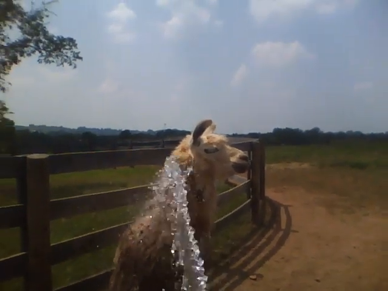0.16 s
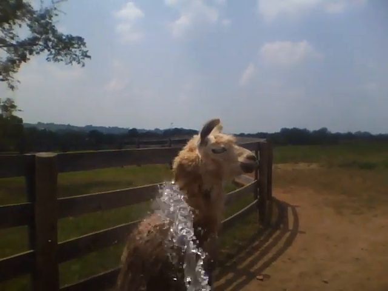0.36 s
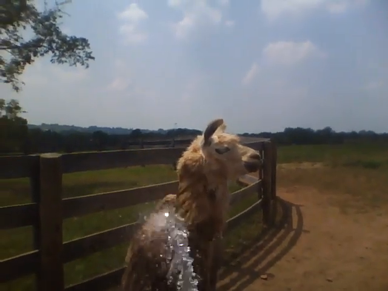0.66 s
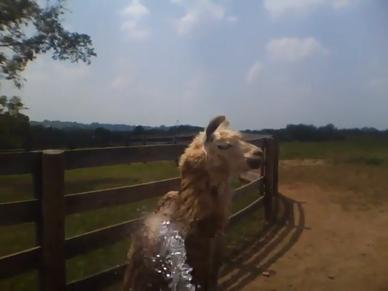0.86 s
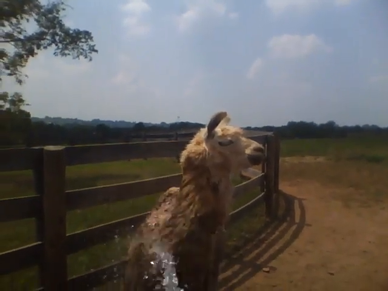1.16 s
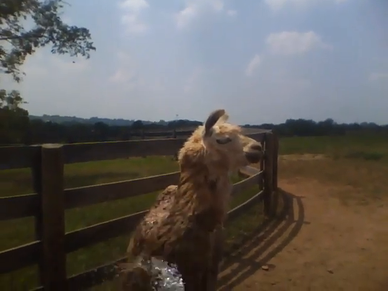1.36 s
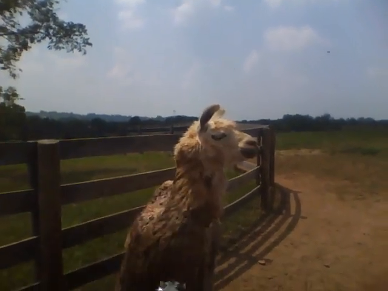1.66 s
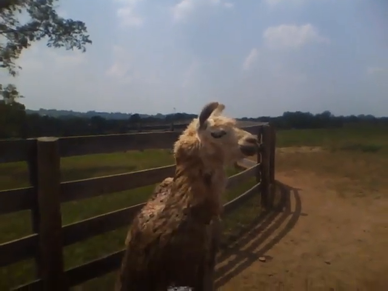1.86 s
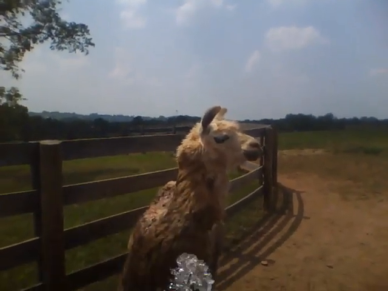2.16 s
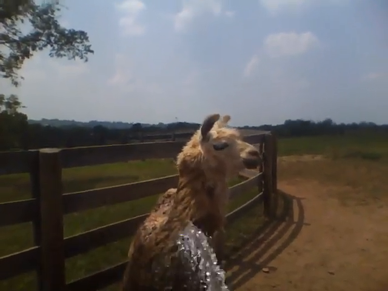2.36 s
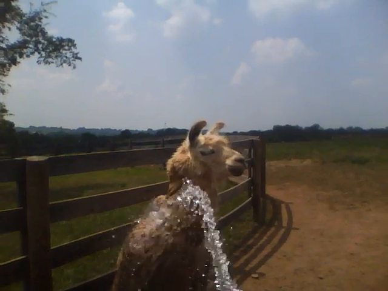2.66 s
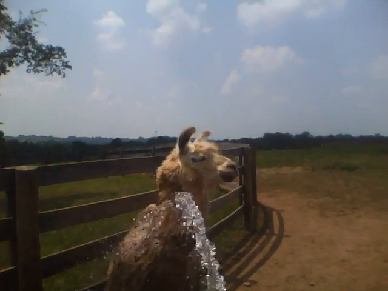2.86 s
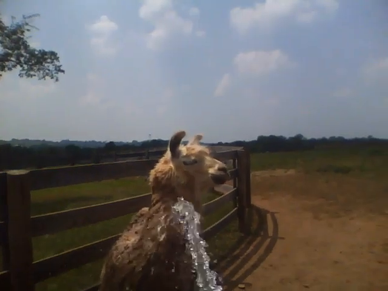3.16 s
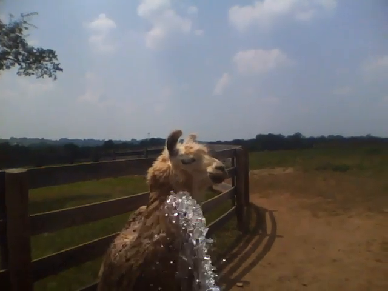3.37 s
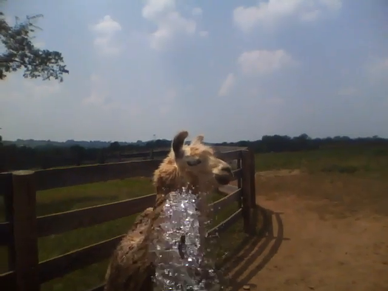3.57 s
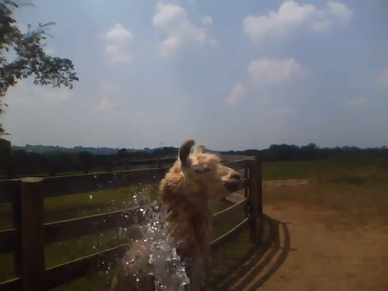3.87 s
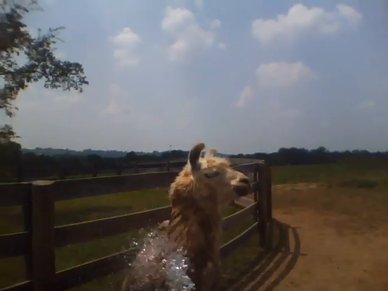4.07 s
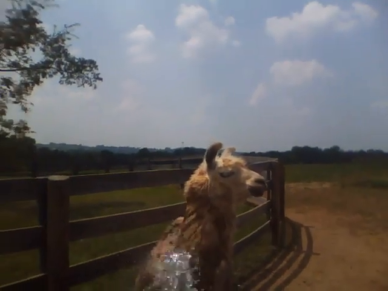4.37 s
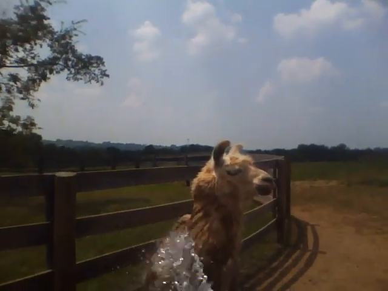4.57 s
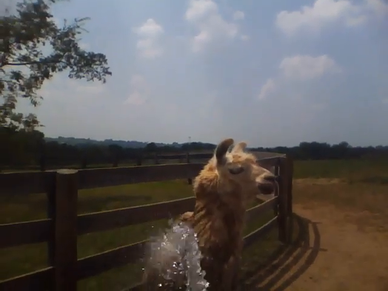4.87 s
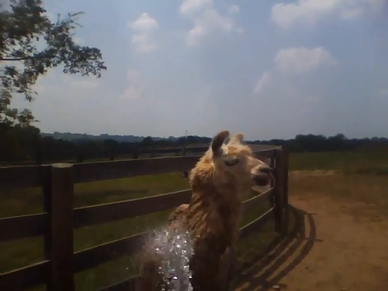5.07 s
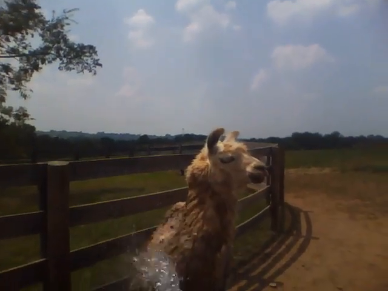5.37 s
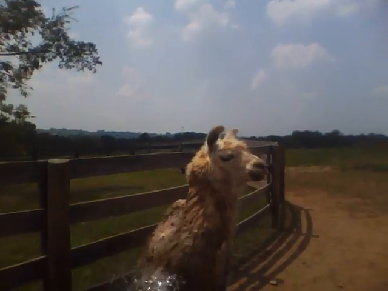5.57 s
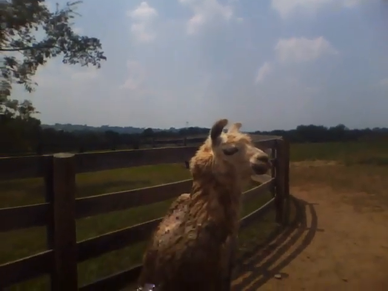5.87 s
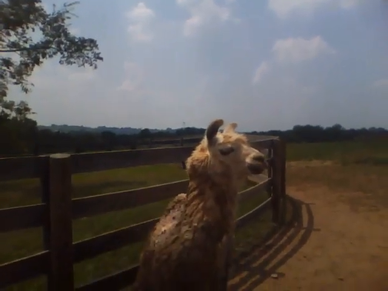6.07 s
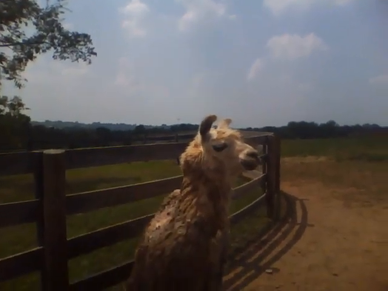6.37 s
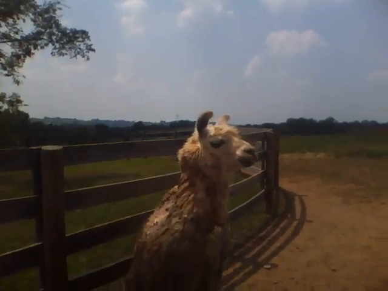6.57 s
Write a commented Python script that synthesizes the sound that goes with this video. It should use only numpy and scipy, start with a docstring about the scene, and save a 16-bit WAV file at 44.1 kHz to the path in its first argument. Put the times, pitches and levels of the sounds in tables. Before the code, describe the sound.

Water from a hose runs without a break for about 6.7 seconds over an animal's wet wool, close to a small camera in an open paddock. A bright, grainy hiss of fine spray mixes with crisp midrange splashing, flickering quickly as loose slugs land. Sparse slaps and plops mark the first second; a tight cluster of sharp slaps comes from 1.3 to 1.75. The stream thins around 2.0, then surges near 2.5 with soft low drumming on the flank. From 2.5 to 4.3 it is fullest, crowded with wet slaps and hollow bubbling plops. After 4.6 it eases into lighter spray, with scattered slaps and plops near 5.1, 5.7 and 6.4. Faint gurgling, low open-air and runoff rush and a nearly inaudible wavering hum remain underneath. The sound is centred, bass-light and slightly resonant.

```python
"""In a paddock, a garden hose plays a loose stream of water over an animal's wet wool, close to a small camera.
The stream breaks into uneven slugs: filtered noise and crowds of damped sines make spray, splash and gurgle,
and low noise drums on the flank. Flurries of short sines make the slaps, ringing bubbles make the plops.
Behind them lie two faint wavering sine tones and the low noise of open country and running-off water.
One microphone feeds both channels; the camera body rings and the microphone limits the band."""
import sys
import numpy as np
from scipy import signal
from scipy.fft import rfft, irfft, next_fast_len
from scipy.io import wavfile
from scipy.ndimage import uniform_filter1d, map_coordinates

SR = 44100
rng = np.random.default_rng(int(sys.argv[2]) if len(sys.argv) > 2 else 0)


def pcm_store(signal):
    """Save signal as 16-bit PCM."""
    levels = np.round(np.clip(np.atleast_2d(signal), -1, 1) * 32767)
    wavfile.write(sys.argv[1], SR, levels.astype(np.int16).T)


N = 296352  # samples, 6.72 s

# The stream as it sweeps the body: (time [s], spray level [dB], splash level [dB], drumming level [dB])
STREAM_LEVELS = [(0.0, -29.5, -35, -61), (0.47, -32.5, -38, -60), (0.9, -30.5, -32.5, -54.5),
                 (1.55, -29, -32, -51.5), (1.76, -30.5, -34.5, -56.5), (1.98, -32.5, -37, -70),
                 (2.24, -29.5, -34, -53.5), (2.49, -26, -33, -43), (2.79, -28, -32.5, -54.5),
                 (3.31, -27, -29, -51.5), (3.52, -26.5, -30, -55.5), (3.97, -31.5, -36, -52.5),
                 (4.32, -28, -31.5, -48.5), (4.6, -31, -35, -55.5), (5.05, -31, -35, -54.5),
                 (5.6, -29.5, -34.5, -55.5), (6.25, -30, -36, -77), (6.72, -29.5, -38.5, -72)]
# Colour of the fine spray: (frequency [Hz], gain [dB])
SPRAY_COLOUR = [(300, -57), (1500, -44), (3000, -1), (4200, -5), (5200, 1.5), (7200, -1.5), (8000, -4),
                (10000, -2.5), (13000, -6), (16000, -10.5)]
# Colour of the splash on wet wool: (frequency [Hz], gain [dB])
SPLASH_COLOUR = [(200, -33), (900, -8.5), (2000, -5.5), (2400, 2), (3000, 4), (3700, 1), (4500, 1.5),
                 (7000, -10)]
# Colour of the gurgling bubbles: (frequency [Hz], gain [dB])
GURGLE_COLOUR = [(150, -55), (600, -13.5), (1000, -8), (1300, -2.5), (1800, -1.5), (2300, -12.5),
                 (4000, -25.5)]
# Colour of the drumming on the flank: (frequency [Hz], gain [dB])
FLANK_COLOUR = [(60, -47.5), (150, -13.5), (270, -0.5), (400, -3.5), (520, -14.5), (900, -35.5)]
GURGLE_DB, GURGLE_GROWS = -48.5, 1.3  # mean level [dB]; dB of swing for each dB of the splash
TICKS_DB = -10.5  # lone fine drops against the spray [dB]


def stream():
    """The jet arrives in uneven slugs that shake every layer at once; the gurgle follows the splash."""
    spray_db, splash_db, drum_db = curves(STREAM_LEVELS)
    gurgle_db = GURGLE_DB + GURGLE_GROWS * (splash_db - splash_db.mean())
    slugs = 0.9 * landings(7, count=500) + 0.5 * wobble(200)

    spray_rush = amp(0.26 * slugs) * patchy(2.2, size=256)
    spray_drops = droplets(3.1 * slugs, 4030, SR / 2.5, 4.37, 1.0, count=12000, length=40)
    spray = layer(SPRAY_COLOUR, spray_rush, spray_drops, 0.46)
    ticks = droplets(1.5 * slugs, 7200, SR / 2.5, 1.9, 0.47, count=500, length=30)

    splash_rush = amp(3.2 * slugs) * patchy(3.5, size=256)
    splash_drops = droplets(3.3 * slugs, 1976, 4700, 2.1, 1.8, count=3500, length=120)
    splash = layer(SPLASH_COLOUR, splash_rush, splash_drops, 0.17)

    gurgle_rush = amp(0.62 * slugs) * patchy(5.5, size=1024)
    bubbles = droplets(2.9 * slugs, 920, 2660, 3.3, 3.1, count=2000, length=400)
    gurgle = layer(GURGLE_COLOUR, gurgle_rush, bubbles, 0.052)

    drum = layer(FLANK_COLOUR, amp(1.5 * slugs) * patchy(2.8, size=2048), 0, 0)

    wet = amp(spray_db) * (spray + amp(TICKS_DB) * ticks) + amp(splash_db) * splash
    return wet + amp(gurgle_db) * gurgle + amp(drum_db) * drum


# Slugs that slap hardest: (time [s], level before DROPLET_DB [dB], pitch [Hz], fine spray against flurry [dB])
SLAP_EVENTS = [(0.3084, -23, 5100, 10), (0.3421, -5.5, 3240, 5), (0.5594, -8, 3300, 4),
               (0.7432, -8.5, 2820, 0), (0.7652, -8, 2430, -1), (0.8126, -4.5, 2920, -3),
               (0.9656, -11, 2830, 6), (1.303, -26, 3160, 5), (1.3184, -10, 2440, 4),
               (1.4045, -1.5, 5360, -11), (1.5385, -11, 3220, 3), (1.6272, -6.5, 3330, -6),
               (1.6587, -9, 2690, 0), (1.6841, -8, 2820, -16), (1.7124, -1.5, 7140, 2),
               (1.753, -7.5, 3680, 8), (2.465, -7.5, 3330, 8), (2.5022, -9, 3400, 9),
               (2.5612, -9, 2920, -5), (2.612, -3, 5400, 0), (2.6882, -4.5, 3770, 9),
               (2.7376, -0.5, 6530, -10), (2.8165, -6.5, 5720, 9), (2.8504, -6.5, 3500, 2),
               (2.9188, -9, 3300, 8), (2.9706, -7, 3270, 2), (3.0294, -8, 3290, 6), (3.0889, -14, 2750, 0),
               (3.129, -7, 2840, 2), (3.2101, -14, 3200, 0), (3.2515, -6, 2120, 2), (3.346, -7, 2900, 11),
               (3.3942, -10, 2900, -3), (3.4111, -1, 3300, -2), (3.4501, -10, 2850, 2),
               (3.4905, -2, 6620, 0), (3.5074, -15, 3180, -5), (3.5247, -6, 2790, -7),
               (3.6705, -3, 3220, 13), (3.7174, -10, 3030, 0), (3.7785, -5, 2800, 2),
               (3.8634, -13, 5800, 8), (3.938, -7.5, 5530, 2), (4.03, -10, 2860, 2), (4.0402, -6, 7100, 7),
               (4.0765, -7.5, 3300, 8), (4.173, -7, 6300, 2), (4.1944, -7, 2920, 2), (4.2567, -7, 5340, 12),
               (4.3154, -8, 2640, -1), (4.4526, -3, 2840, 0), (4.6399, -8, 3870, 1), (4.7755, -10, 4670, 6),
               (5.4284, -6.5, 3240, 7), (5.69, -10, 3080, 2), (5.7437, -2.5, 3260, -9),
               (5.8665, -4, 3040, -3), (6.3882, -17, 3100, 6), (6.4667, -3.5, 6640, -5),
               (6.5146, -10, 6240, 12), (6.7062, -8, 3950, 2)]
SLAP_MS, FIZZ_HZ = 11, 8200  # time over which the droplets start [ms], central pitch of the fine spray [Hz]
SLAP_CYCLES = 1.8  # decay of one droplet [cycles]
DROPLET_DB = -8  # offset of the droplets from the slap's level [dB]


def slaps():
    """Each slap is a flurry at its own pitch with a burst of fine spray on top; wool takes no deep blow."""
    s, db, hz, fizz_db = np.transpose(SLAP_EVENTS)[:, :, None]
    droplet_db = db + DROPLET_DB
    body = scatter(s, hz, droplet_db, SLAP_MS, SLAP_CYCLES, 0.15, count=14, length=200)
    fizz = scatter(s, FIZZ_HZ, droplet_db + fizz_db, SLAP_MS, 0.77, 0.36, count=18, length=50)
    low_cut = [(100, -60), (800, -24), (1600, -10), (2300, 0)]  # (frequency [Hz], gain [dB])
    return coloured(body + fizz, lambda f: along(low_cut, f))


# Large air pockets closing: (time [s], level before the low cut [dB], pitch [Hz])
PLOP_EVENTS = [(0.341, -17, 1700), (0.555, -23, 1670), (0.676, -21, 1250), (1.269, -20, 1830),
               (1.301, -25, 1900), (1.319, -13, 1380), (2.464, -15.5, 1680), (2.653, -21, 1770),
               (2.91, -25, 1720), (2.966, -11, 1810), (3.125, -11, 1830), (3.218, -32, 1710),
               (3.252, -21, 1710), (3.403, -12, 1690), (3.449, -11.5, 1670), (3.508, -18, 1610),
               (3.615, -20, 930), (4.316, -18, 2010), (4.493, -23, 1130), (5.131, -14.5, 1150),
               (5.687, -21, 1430), (5.867, -12.5, 1820), (6.178, -19.5, 1950)]
PLOP_MS = 12  # time over which the bubbles start [ms]


def plops():
    """An air pocket breaks into a few bubbles, each a damped ring."""
    s, db, hz = np.transpose(PLOP_EVENTS)[:, :, None]
    ring = scatter(s, hz, db, PLOP_MS, 1.11, 0.14, count=5, length=700)
    low_cut = [(150, -45), (800, 0)]  # (frequency [Hz], gain [dB])
    return coloured(ring, lambda f: along(low_cut, f))


# The low tones swell and fade: (time [s], upper tone level [dB], lower tone level [dB])
HUM_LEVELS = [(0.0, -67, -66), (0.95, -64.5, -81), (1.7, -72, -71), (3.0, -64.5, -82), (4.4, -59, -67),
              (4.75, -86, -67), (6.72, -68, -86)]
# Pitches of the two tones: upper [Hz], lower [Hz]
HUM_PITCHES = [156, 102]


def hum():
    """Two faint low sine tones that waver in level and phase."""
    t = np.arange(N) / SR
    tones = np.zeros(N)
    for hz, db in zip(HUM_PITCHES, curves(HUM_LEVELS)):
        level = amp(db + 2.7 * wobble(7.3))
        turns = hz * t + 0.11 * wobble(6.9)
        tones += level * np.sin(2 * np.pi * turns)
    return tones


# Level of the open-air background: (time [s], level [dB])
FIELD_LEVELS = [(0.0, -49), (0.52, -57), (1.57, -52), (1.81, -51), (4.19, -53), (4.47, -59), (4.81, -51.5),
                (5.2, -56), (6.48, -49.5), (6.72, -54.5)]
# Colour of the open-air background: (frequency [Hz], gain [dB])
FIELD_COLOUR = [(20, -7), (60, -8.5), (150, -4), (300, -3), (520, -4), (750, 4), (1100, -4), (2000, -34.5)]


def field():
    """The low rush of open country and running-off water, as patchy filtered noise."""
    level_db, = curves(FIELD_LEVELS)
    return amp(level_db) * layer(FIELD_COLOUR, patchy(3.8, size=1024), 0, 0)


def layer(spectrum, rush, drops, share):
    """Rushing noise and single droplets in one colour, rms 1; share is the droplets' part of the power."""
    mixed = np.sqrt(1 - share) * unit(rush) + np.sqrt(share) * drops
    return unit(coloured(mixed, lambda hz: along(spectrum, hz)))


def landings(ms, count):
    """Slugs land at random: each raises the level quickly and drains away over ms; mean 0, rms 1."""
    kicks = np.bincount(rng.integers(0, N, count), rng.exponential(size=count), N)
    t_ms = np.arange(4000) / SR * 1000
    pulse = np.exp(-t_ms / ms) * (1 - np.exp(-t_ms / 0.6))
    swell = signal.fftconvolve(kicks, pulse)[:N]
    swell = np.log(np.abs(swell) + 0.6)
    return unit(swell - swell.mean())


def droplets(slugs_db, lo_hz, hi_hz, spread_db, cycles, count, length):
    """Random droplets, crowded where a slug lands, a few far larger than the rest; rms 1."""
    chance = rng.random((count, 3))
    crowd = np.cumsum(amp(slugs_db))
    s = np.interp(chance[:, 0], crowd / crowd[-1], np.arange(N) / SR)
    hz = lo_hz + (hi_hz - lo_hz) * chance[:, 1]
    size_db = np.minimum(-spread_db * np.log(1 - chance[:, 2]), 4.13 * spread_db)
    size = np.sqrt(hz) * amp(size_db)
    return unit(grains(s, hz, size, cycles, 0.049, length))


CREST, FADE_DB = 0.21, 20  # where a flurry peaks [fraction of its length]; fall to both sides [dB per length]


def scatter(s, hz, db, ms, cycles, spread, count, length):
    """For each event a flurry of droplets around its pitch that swells quickly and dies."""
    late = rng.random((len(s), count)) ** 1.2 * (np.arange(count) > 0)  # the first starts on time
    luck = rng.standard_normal((len(s), count, 2))
    pitch = np.clip(hz * np.exp(spread * luck[..., 0]), 500, SR / 2.6)
    size = amp(db - FADE_DB * np.abs(late - CREST) + 1.2 * luck[..., 1])
    start = s + ms / 1000 * late
    return grains(start.ravel(), pitch.ravel(), size.ravel(), cycles, 0.038, length)


def grains(s, hz, size, cycles, rise, length):
    """Damped sines with a soft start, one for each time; the pitch climbs as a bubble nears the surface."""
    k = np.arange(length)
    turns = hz[:, None] * k / SR
    envelope = np.exp(-turns / cycles) * (1 - np.exp(-3.2 * turns))
    wave = np.sin(2 * np.pi * turns * (1 + rise * turns / cycles)) * envelope
    where = np.clip((s * SR).astype(int)[:, None] + k, 0, N)  # overruns fall into a spare last slot
    return np.bincount(where.ravel(), (size[:, None] * wave).ravel(), N + 1)[:N]


def patchy(patchy_db, size):
    """Noise with patches of random gain in time and frequency; a larger size gives longer, narrower patches."""
    z = signal.stft(rng.standard_normal(N + 2 * size), nperseg=size)[2]
    patches = uniform_filter1d(rng.standard_normal(z.shape), size=3, axis=1)
    patches = uniform_filter1d(patches, size=6, axis=0)
    noise = signal.istft(z * amp(patchy_db * unit(patches)), nperseg=size)[1]
    return unit(noise[:N])


def coloured(x, db_of):
    """x through a causal minimum-phase filter whose gain in dB is a function of frequency."""
    m = 2 * next_fast_len(N // 2 + 4096)
    cepstrum = irfft(db_of(np.fft.rfftfreq(m, 1 / SR)) * np.log(10) / 20, m)
    cepstrum[1:m // 2] *= 2  # fold the cepstrum onto positive time
    cepstrum[m // 2 + 1:] = 0
    return irfft(rfft(x, m) * np.exp(rfft(cepstrum)), m)[..., :N]


def wobble(rate):
    """A smooth random curve, rate knots a second."""
    knots = rng.standard_normal(int(N * 400 / SR) + 4)
    return map_coordinates(knots, [np.arange(N) * rate / SR])


def curves(rows):
    """One value per sample for each column after the time."""
    s, *cols = np.transpose(rows)
    return [np.interp(np.arange(N) / SR, s, c) for c in cols]


def along(points, hz):
    """(frequency [Hz], value) points read on a log frequency axis."""
    f, v = np.transpose(points)
    return np.interp(np.log(hz + 1), np.log(f + 1), v)


def amp(db):
    """Decibels to gain."""
    return 10 ** (np.asarray(db) / 20)


def unit(x):
    """Scaled to rms 1."""
    return x / np.sqrt(np.mean(x ** 2) + 1e-20)


# Colour of the noise that differs between the channels: (frequency [Hz], gain [dB])
APART_COLOUR = [(20, 1), (60, 0), (150, -1), (700, 0), (1100, -6), (2000, -12), (2300, -30), (2600, -60),
                (6600, -120)]


def scene():
    """One microphone feeds both channels; only a faint, flickering low noise differs between them."""
    mid = stream() + slaps() + plops() + hum() + field()
    side = amp(-64) * layer(APART_COLOUR, patchy(5.5, size=1024), 0, 0)
    return np.array([mid + side, mid - side])


# Resonances of the camera body: (frequency [Hz], width [Hz], boost [dB])
BODY_RINGS = [(1640, 40, 0.5), (2410, 67, -1.5), (2793, 146, 3.5), (3316, 142, 3.5), (3750, 22, 5)]
# The microphone's low end: (frequency [Hz], gain [dB])
MIC_BASS = [(20, -14), (45, -7), (90, 0)]
TOP_HZ = 15760  # upper band limit [Hz]


def record(dry):
    """The camera body rings at a few pitches; the microphone weakens deep bass and drops all above its limit."""
    def response_db(hz):
        """Bass cut plus one resonance curve for each ring of the body."""
        rings = sum(db / (1 + ((hz - c) / (w / 2)) ** 2) for c, w, db in BODY_RINGS)
        return along(MIC_BASS, hz) + rings

    body = coloured(dry, response_db)
    body = np.pad(body, ((0, 0), (0, 4096)))  # keeps the sharp filter from wrapping round
    in_band = np.fft.rfftfreq(N + 4096, 1 / SR) < TOP_HZ
    return irfft(rfft(body) * in_band)[:, :N]


dry = scene()
out = record(dry)
pcm_store(out)
```